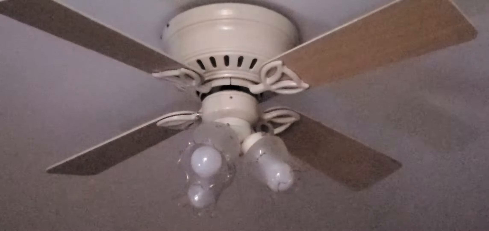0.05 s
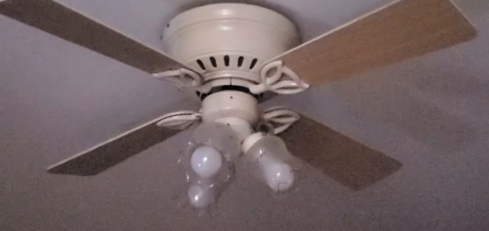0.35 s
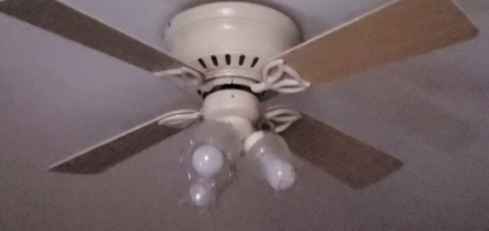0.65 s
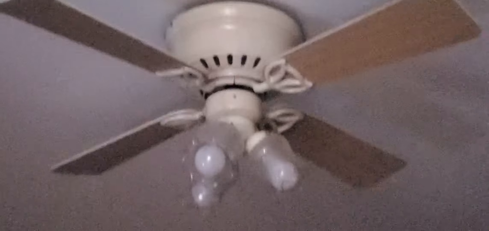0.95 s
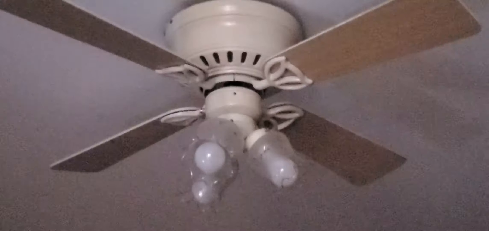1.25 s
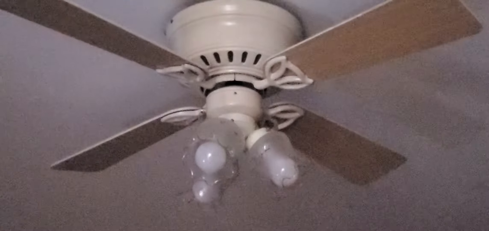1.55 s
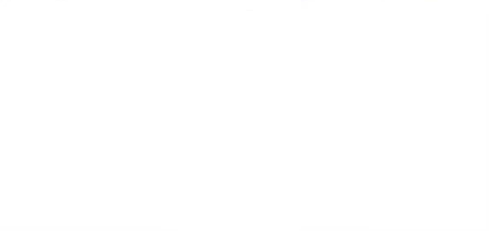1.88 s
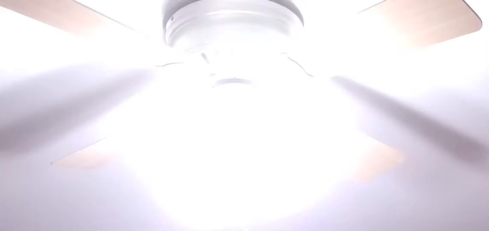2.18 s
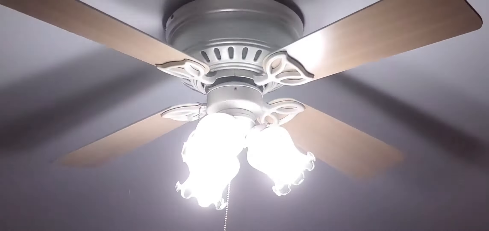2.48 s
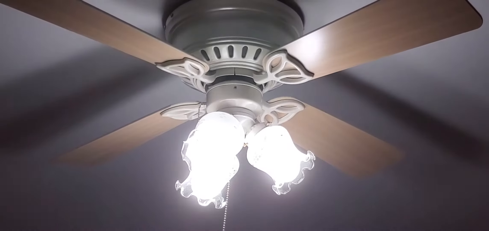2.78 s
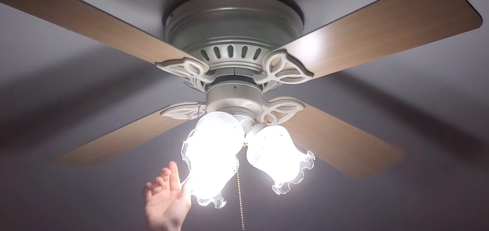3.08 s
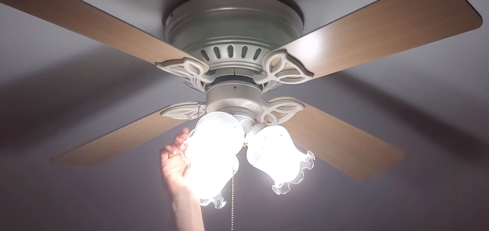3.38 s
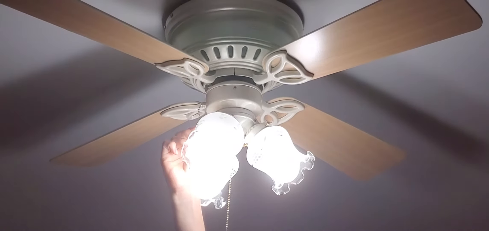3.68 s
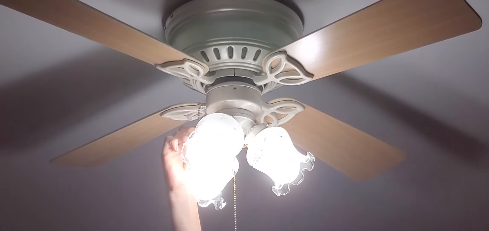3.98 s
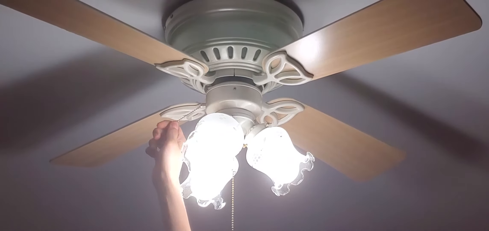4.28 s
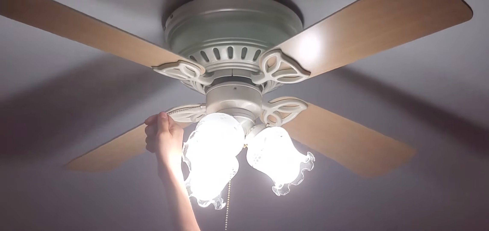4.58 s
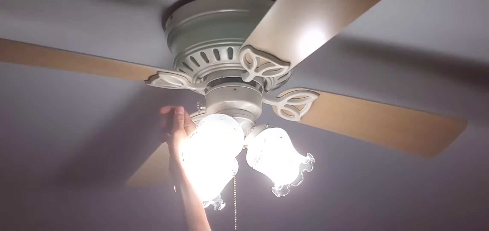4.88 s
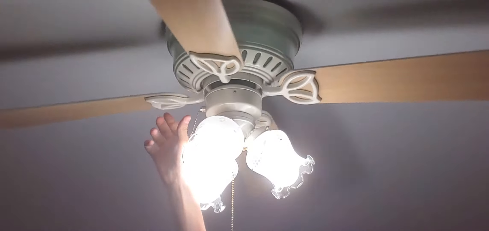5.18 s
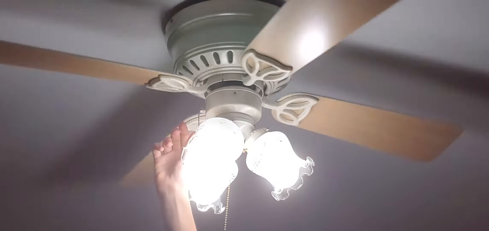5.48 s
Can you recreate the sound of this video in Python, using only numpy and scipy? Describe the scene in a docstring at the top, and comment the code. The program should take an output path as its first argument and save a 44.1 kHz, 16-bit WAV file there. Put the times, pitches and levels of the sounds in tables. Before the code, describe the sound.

Two wall switches snap amid handling bumps, then a ceiling fan's pull chain clicks and chinks over a faint hum.

```python
"""A small, quiet room: low air noise and the faint hum of a ceiling fan's motor.
A hand shifts on the microphone's case with ticks, scuffs, thuds and rumble. Near 1.8 s and 2.1 s two
wall switches snap, ringing plate and wall cavity. Clothes rustle as an arm reaches up. From 4.3 s it
works the pull chain: the ratchet clicks, the bead chain chinks and the hum rises.
At 5.5 s a thin whine joins briefly."""
import sys
import numpy as np
from scipy import signal
from scipy.fft import rfft, irfft
from scipy.io import wavfile
from scipy.ndimage import uniform_filter1d

SR = 44100
rng = np.random.default_rng(int(sys.argv[2]) if len(sys.argv) > 2 else 0)


def master_out(mix):
    """Clip the mix to full scale and print it as 16-bit PCM to the path in sys.argv[1]."""
    frames = np.transpose(np.atleast_2d(mix))
    ceiling = np.clip(frames, -1, 1)
    pcm = np.round(ceiling * 32767).astype(np.int16)
    wavfile.write(sys.argv[1], SR, pcm)


N = 248724
TIME = np.arange(N) / SR

# room air spectrum: f/Hz, level/dB
AIR_SPECTRUM = [(15, -30), (25, 2.5), (108, 2), (170, -9), (317, -9), (591, -22.5), (818, -34.5),
                (1560, -39), (3080, -50.5), (5730, -62), (6740, -32.5), (7510, -63), (8830, -41),
                (14800, -40), (16000, -39.5)]
# winding hum partials: f/HUM_HZ, level/dB
HUM_PARTIALS = [(.5, -9), (1, 0), (2, -18), (3, -25)]
# clothes rubbing as the body turns and steps: t/s, level/dB
BODY_RUB_CURVE = [(0, -74), (1.45, -71), (2.05, -67.5), (2.25, -59), (2.65, -84), (2.92, -61.5),
                  (3.27, -71.5), (4.3, -75.5), (5.6, -75)]
# soft cloth rub spectrum: f/Hz, level/dB
RUB_SPECTRUM = [(150, -2), (330, 0), (600, -7), (800, -3.5), (1000, -8.5), (1280, -9), (1650, -20),
                (3000, -19.5), (6000, -22), (8000, -37.5), (12000, -49.5)]
# swish spectrum: f/Hz, level/dB
SWISH_SPECTRUM = [(700, 1), (2000, -14), (3200, -7.5), (5800, 2.5), (7600, 1), (9500, 4.5), (14500, 5),
                  (16000, -6.5)]
# finger ticks on the case: t/s, level/dB, treble/dB, left-right/dB
FINGER_TICKS = [(0.186, -37.5, -14, -24), (0.498, -32.5, 4, -29), (0.504, -32.5, 6, -25),
                (.507, -15.5, -6.5, -7), (.510, -14, -10, -28), (0.967, -54.5, 4.5, 0),
                (1.195, -43, -23, -8), (1.474, -25.5, 2.5, -29), (1.5, -20.5, 2, -23), (1.505, -25, 7, 7.5),
                (2.089, -24.5, -30, -10), (2.233, -31.5, -13, -19), (2.422, -34.5, -26, -13),
                (2.9, -18, -30, -16)]
# tapped case spectrum: f/Hz, level/dB
CASE_SPECTRUM = [(80, 10), (300, 4), (560, 8), (700, -10.5), (900, 8.5), (1500, -3.5), (2000, -2.5),
                 (2500, -14.5), (3150, -3), (3800, -6.5), (5200, -10), (6500, -9), (9000, -18),
                 (15500, -4.5)]
# palm scuffs on the case: peak t/s, level/dB, left-right/dB, bright swish/dB
PALM_SCUFFS = [(0.294, -52.5, -15, -71.5), (0.506, -46, -10, -80), (1.195, -51, -18, -64),
               (1.479, -40.5, -8, -61), (2.782, -39, 0, -79), (2.818, -34.5, -0.5, -75),
               (2.86, -46, 3, -79), (2.903, -45.5, 2, -70)]
# palm-on-case spectrum: f/Hz, level/dB
PALM_SPECTRUM = [(100, 9), (420, -0.5), (620, -6), (850, -8.5), (1200, -11), (2300, -15.5), (4000, -23),
                 (6500, -26), (9000, -35), (15500, -35)]
# dull knocks: t/s, level/dB, f/Hz, left-right/dB
KNOCKS = [(0.299, -48, 79.4, -21), (0.504, -34, 65.3, -18), (0.502, -44.5, 169, -12),
          (.775, -46.5, 302, 24), (1.193, -39, 89, -38), (1.467, -24.5, 84, -29), (1.473, -29, 179, -27),
          (1.475, -35, 288, -32), (1.785, -33.5, 67.3, 4.5), (1.853, -35, 64.4, 5),
          (2.131, -36.5, 85.3, -27), (2.418, -44.5, 103.7, -17), (2.421, -49.5, 500, -17),
          (2.762, -29, 222, -0.5), (2.762, -32.5, 44.3, 3), (2.780, -32, 226, -1), (2.803, -26.5, 240, 0.5),
          (2.819, -30.5, 57, 1.5), (4.392, -44.5, 340, 0), (4.572, -44.5, 139, 1), (4.593, -45, 50, 2),
          (4.791, -42, 58.6, 2)]
# clothes swish and rub: peak t/s, length/s, swish/dB, rub/dB
CLOTH_STROKES = [(0.55, 0.14, -74, -63), (0.852, .07, -70, -64), (2.337, 0.076, -69.5, -57.5),
                 (2.461, 0.26, -72, -58.5), (2.83, 0.38, -67.5, -52.5), (3.076, 0.078, -60.5, -81),
                 (3.142, 0.095, -61.5, -53.5), (3.348, 0.085, -67, -75), (3.482, 0.054, -70, -64.5),
                 (3.55, 0.11, -71, -75), (3.797, 0.29, -75.5, -99), (3.9, 0.17, -66, -87),
                 (4.132, 0.15, -77.5, -67.5), (4.565, 0.15, -79, -66.5)]
# rumble as the grip shifts or the chain is held taut: t/s, length/s, level/dB, left-right/dB
RUMBLE_SPELLS = [(0.587, 0.37, -55.5, -15), (1.806, 0.49, -53, 0.5), (2.79, 0.13, -51, 4),
                 (4.394, 0.57, -51.5, 3)]
# rumble spectrum: f/Hz, level/dB
RUMBLE_SPECTRUM = [(20, -23), (48, -0.5), (68, 2.5), (100, -12.5), (160, -20.5), (400, -24.5), (2000, -81)]
# wall switch snaps: t/s, level/dB, plate/dB, cavity/dB, treble/dB
SWITCH_SNAPS = [(1.766, -20, -22, -33, 15.5), (1.770, -16.5, 2, -33, 17), (1.784, -19.5, 7, -7.5, 2),
                (2.110, -6.5, -5.5, -14, -15), (2.123, -14.5, 3, -1.5, -25)]
# toggle snap spectrum: f/Hz, level/dB
TOGGLE_SPECTRUM = [(150, -21.5), (380, -3.5), (540, -3), (680, -3.5), (1200, 1), (1650, -3.5), (2500, -3.5),
                   (4200, -0.5), (5200, -1), (7400, -9.5), (8800, -3), (11000, -0.5), (15500, -1)]
# wall plate modes: f/Hz, level/dB, t60/s
PLATE_MODES = [(875, -4, 0.05), (900, -1.5, 0.15), (929, 1.5, 0.2), (1024, -2.5, 0.088), (1034, -18, 0.78),
               (1310, -14, 0.27), (5200, -11, 0.07)]
# hollow wall modes: f/Hz, level/dB, t60/s
CAVITY_MODES = [(515, 4, 0.28), (573, 6, 0.14)]
# pull-chain ratchet clicks: t/s, level/dB, housing/dB, treble/dB, contact f/Hz
RATCHET_CLICKS = [(4.345, -29.5, -10, -6, 6250), (4.365, -22, -5.5, 0, 5400), (4.387, -23, 2, 10, 2280),
                  (4.391, -13.5, -5.5, 2, 2310), (4.404, -23, 10.5, -12, 2260),
                  (4.798, -22.5, -16, 6.5, 2720), (4.832, -6.5, -26.5, 4.5, 3180),
                  (4.838, -4, -13.5, 3, 5140), (4.846, -12.5, 5.5, -7.5, 3240),
                  (4.948, -9, -32.5, 3.5, 5080), (4.964, -11.5, -8.5, -10, 8100),
                  (5.387, -16, -43, -18, 5600), (5.393, -20, -38, -12, 4950), (5.423, -14, -49, -17, 3950),
                  (5.533, -43, -20, -1, 3680)]
# ratchet click spectrum: f/Hz, level/dB
RATCHET_SPECTRUM = [(300, -38.5), (850, -12.5), (1350, 2.5), (1700, -7), (2200, -2), (3400, -1),
                    (4200, -0.5), (5200, 3.5), (7000, -2), (8600, -3), (10000, 1.5), (12600, 4), (15500, 0)]
# ratchet housing spectrum: f/Hz, level/dB
HOUSING_SPECTRUM = [(120, -19), (200, 4), (330, -11), (540, 8.5), (750, 1.5), (840, 1), (1000, 3),
                    (1400, -1), (2000, -11), (5000, -41)]
# spring and pawl modes: f/Hz, level/dB, t60/s
PAWL_MODES = [(3135, -6, 0.21), (3630, -11.5, 0.36), (5050, -31.5, 0.22), (12300, 7.5, 0.13),
              (12850, 3.5, .10), (14650, 16, 0.075)]
# bead chain and fitting modes: f/Hz, level/dB, t60/s
CHAIN_MODES = [(3660, -24.5, 0.14), (4100, -17.5, 0.1), (5105, -8.5, 0.11), (5940, -9, 0.14),
               (6800, -10.5, 0.097), (7690, -0.5, 0.13), (8250, -6.5, 0.21), (8540, -0.5, 0.16),
               (8600, 0, 0.15), (8750, -5.5, 0.1), (9090, 0.5, 0.0904), (9750, -12, 0.064),
               (10720, -6.5, 0.19), (12500, -7.5, 0.09), (13300, -9.5, .12), (13870, -1, 0.18),
               (14592, -10, .08), (15105, -10.5, .08)]
# slack chain hitting its fitting: t/s, level/dB
CHAIN_CHINKS = [(4.391, -28), (4.950, -20), (4.964, -11), (4.978, -13.5), (5.007, -20.5), (5.387, -23.5)]
# microphone port balance: f/Hz, left-right/dB
PORT_BALANCE = [(100, -2), (330, 1.5), (520, 0), (750, -3.5), (1200, -6.5), (2000, 2), (3400, 3), (5000, 0),
                (9000, 1.5), (11000, 5.5), (13000, 2.5), (15500, 34.5)]
# electronic hiss spectrum: f/Hz, level/dB
HISS_SPECTRUM = [(2000, -22), (3300, 2), (4800, -33), (6700, 3), (7400, -20.5), (16000, -41)]

AIR_DB, HISS_DB = -60, -88
HUM_HZ, HUM_IDLE_DB, HUM_RUNNING_DB = 120, -68, -60.5
MOTOR_ON_S, MOTOR_RISE_S = 4.39, 0.06
CUTOFF_HZ = 16150


def from_db(db):
    """Decibels to gain."""
    return 10 ** (np.asarray(db) / 20)


def rms_one(x):
    """Scale to rms 1."""
    return x / np.sqrt(np.mean(x ** 2) + 1e-20)


def unit_energy(x):
    """Scale to mean energy 1 per channel."""
    return rms_one(x) / np.sqrt(x.shape[-1])


def panned(db):
    """Constant-power gains for a left-right difference."""
    gains = from_db(np.array([[.5], [-.5]]) * db)
    return gains / np.sqrt(np.mean(gains ** 2, axis=0))


def through(x, response):
    """Convolve, trim to N."""
    return signal.oaconvolve(np.atleast_2d(x), np.atleast_2d(response), axes=-1)[:, :N]


def colour(spectrum, size=4096):
    """Minimum-phase response of a spectrum."""
    hz, db = np.transpose(spectrum)
    grid_hz = np.maximum(np.fft.rfftfreq(size, 1 / SR), 1)
    magnitude = from_db(np.interp(np.log(grid_hz), np.log(hz), db))
    cepstrum = irfft(np.log(magnitude))
    cepstrum[1:size // 2] *= 2
    cepstrum[size // 2 + 1:] = 0
    return irfft(np.exp(rfft(cepstrum)))


def white_pair(correlation, size):
    """Two partly correlated white noises."""
    mid, side = rng.standard_normal((2, size))
    return np.sqrt(1 + correlation) * mid + np.sqrt(1 - correlation) * side * np.array([[1], [-1]])


def noise(spectrum, correlation):
    """Steady coloured stereo noise, rms 1."""
    response = colour(spectrum)
    white = white_pair(correlation, N + len(response) - 1)
    return rms_one(signal.oaconvolve(white, response[None], "valid", axes=-1))


def spell(start_s, length_s, attack_s, release_s):
    """Linear attack, hold, exponential release."""
    attack = np.clip((TIME - start_s) / attack_s, 0, 1)
    return attack * np.exp(-np.maximum(TIME - start_s - length_s, 0) / release_s)


def clicks(times_s, db):
    """One impulse per contact."""
    out = np.zeros(N)
    np.add.at(out, np.round(times_s * SR).astype(int), from_db(db))
    return out


def ringing(modes, beat_hz):
    """Decaying modes; their many room paths beat at random, differently at each port."""
    t = TIME[:SR // 3]
    knots_s = np.arange(200) / beat_hz
    out = 0
    for hz, db, t60_s in modes:
        paths = rng.standard_normal((2, 200)) + 1j * rng.standard_normal((2, 200))
        beating = np.array([np.interp(t, knots_s, path) for path in paths])
        envelope = from_db(-60 * t / t60_s) * (1 - np.exp(-t * hz / 3))
        wave = envelope * np.real(beating * np.exp(2j * np.pi * hz * t))
        out += from_db(db) * np.sqrt(t60_s) * wave / np.linalg.norm(wave, axis=1, keepdims=True)
    return unit_energy(out)


def room(x, direct_db, direct_t60_s, early_t60_s, late_db, late_t60_s, late_hz, correlation):
    """Brief direct crack, crowded wall and ceiling reflections, duller late tail."""
    size = SR // 2
    t = TIME[:size]
    direct = unit_energy(white_pair(correlation, size) * from_db(-60 * t / direct_t60_s))
    early = white_pair(correlation, size)
    early = unit_energy(early * from_db(4.4 * rng.standard_normal(size) - 60 * t / early_t60_s))
    late = signal.lfilter(*signal.butter(1, late_hz, fs=SR), white_pair(correlation, size))
    late = unit_energy(late * from_db(-60 * t / late_t60_s) * (1 - np.exp(-t / 0.014)))
    return through(x, unit_energy(from_db(direct_db) * direct + early + from_db(late_db) * late))


def near_echoes(echo_gain, spread_s):
    """Close surfaces return a click within milliseconds and comb its spectrum."""
    response = np.zeros((2, SR // 40))
    response[:, 0] = 1
    for side in response:
        lags = (rng.uniform(.15, 1, size=16) * spread_s * SR).astype(int)
        side[lags] = echo_gain * rng.choice([-1, 1], len(lags))
    return unit_energy(response)


def scattered_clicks(times_s, db, treble_db, spectrum, split_hz, echo_gain, spread_s):
    """Contacts at slightly different spots, each with its own near echoes."""
    out = np.zeros((2, N))
    body = unit_energy(colour(spectrum))
    dull = signal.lfilter(*signal.butter(1, split_hz, fs=SR), body)
    for at_s, gain, treble in zip(times_s, from_db(db), from_db(treble_db)):
        click = gain * (dull + treble * (body - dull))
        echoed = signal.fftconvolve(click[None], near_echoes(echo_gain, spread_s), axes=-1)
        start = round(at_s * SR)
        out[:, start:start + echoed.shape[1]] += echoed[:, :N - start]
    return out


def room_air():
    """Steady low murmur of the air."""
    return from_db(AIR_DB) * noise(AIR_SPECTRUM, correlation=0.89)


def motor_hum():
    """Windings hum at twice the mains rate, louder once switched on."""
    level_db = np.interp(TIME, [MOTOR_ON_S, MOTOR_ON_S + MOTOR_RISE_S], [HUM_IDLE_DB, HUM_RUNNING_DB])
    hum = sum(from_db(db) * np.sin(2 * np.pi * (ratio * HUM_HZ * TIME + rng.random()))
              for ratio, db in HUM_PARTIALS)
    return np.sqrt(2) * from_db(level_db) * hum


def rustle(catch_db=0.5):
    """Cloth rubs and swishes, fibres catching at random; a palm scuffs the case."""
    swish_gain, rub_gain = cloth_strokes()
    palm_gain, scuff_swish_gain = palm_scuffs()
    body_gain = from_db(np.interp(TIME, *np.transpose(BODY_RUB_CURVE)))
    scuff = palm_gain * noise(PALM_SPECTRUM, correlation=0.7)
    catching = rms_one(uniform_filter1d(rng.standard_normal(N), size=90))
    rub = np.hypot(rub_gain, body_gain) * noise(RUB_SPECTRUM, correlation=0.13)
    swish = np.hypot(swish_gain, scuff_swish_gain) * noise(SWISH_SPECTRUM, correlation=0.092)
    return rms_one(from_db(catch_db * catching)) * (rub + swish + scuff)


def finger_ticks(split_hz=950):
    """Fingers slip on the case, mostly by the right port: nearly dry, tip duller than nail."""
    times_s, db, treble_db, pan_db = np.transpose(FINGER_TICKS)
    lowpass = signal.butter(1, split_hz, fs=SR)
    contacts = []
    for side in (1, -1):
        side_db = db + side * pan_db / 2 - np.abs(pan_db) / 3
        plain, sharp = clicks(times_s, side_db), clicks(times_s, side_db + treble_db)
        contacts.append(sharp + signal.lfilter(*lowpass, plain - sharp + 1e-18))
    ticks = through(contacts, unit_energy(colour(CASE_SPECTRUM)))
    in_room = room(ticks, direct_db=22.5, direct_t60_s=0.014, early_t60_s=0.4,
                   late_db=-17, late_t60_s=0.4, late_hz=5140, correlation=0.14)
    return from_db(-1.5) * ticks + from_db(4.5) * in_room


def palm_scuffs(rise_db_per_s=905, fall_db_per_s=267):
    """Stereo palm gain and bright swish gain: each scuff bites fast, slides out slower."""
    palm, swish = 0, 0
    for peak_s, db, pan_db, swish_db in PALM_SCUFFS:
        slide = from_db(-np.maximum((peak_s - TIME) * rise_db_per_s, (TIME - peak_s) * fall_db_per_s))
        sides_db = db + np.array([[1], [-1]]) * pan_db / 2 - abs(pan_db) / 3
        palm = np.hypot(palm, from_db(sides_db) * slide)
        swish = np.hypot(swish, from_db(swish_db) * slide)
    return palm, swish


def thuds(swell_cycles=0.85):
    """Soft blows swell and die in a few cycles; lower ones last longer."""
    out = np.zeros((2, N))
    for at_s, db, hz, pan_db in KNOCKS:
        cycles = hz * np.maximum(TIME - at_s, 0)
        age = np.minimum(cycles / swell_cycles, 40)
        out += panned(pan_db) * from_db(db) * age * np.exp(1 - age) * np.sin(2 * np.pi * cycles)
    return out


def cloth_strokes(edge_db=9, roundness=1.35):
    """Swish and rub gains: each stroke swells and fades with arm speed."""
    swish, rub = 0, 0
    for peak_s, length_s, swish_db, rub_db in CLOTH_STROKES:
        fall_db = edge_db * np.abs(2 * (TIME - peak_s) / length_s) ** roundness
        speed = from_db(-np.minimum(fall_db, 200))
        swish = np.hypot(swish, from_db(swish_db) * speed)
        rub = np.hypot(rub, from_db(rub_db) * speed)
    return swish, rub


def rumble():
    """Countless small jolts merge into spells of low rumble."""
    gain = sum(panned(pan_db) * from_db(db) * spell(at_s, length_s, attack_s=0.0067, release_s=0.11)
               for at_s, length_s, db, pan_db in RUMBLE_SPELLS)
    return gain * noise(RUMBLE_SPECTRUM, correlation=0.9)


def wall_switches():
    """Each toggle snaps over and lands, ringing the plate and the hollow wall."""
    times_s, db, plate_db, cavity_db, treble_db = np.transpose(SWITCH_SNAPS)
    snap = scattered_clicks(times_s, db, treble_db, TOGGLE_SPECTRUM,
                            split_hz=13200, echo_gain=0.12, spread_s=0.004)
    plate = through(clicks(times_s, db + plate_db), ringing(PLATE_MODES, beat_hz=148.8))
    cavity = through(clicks(times_s, db + cavity_db), ringing(CAVITY_MODES, beat_hz=58))
    in_room = room(snap, direct_db=-12, direct_t60_s=0.041, early_t60_s=0.16,
                   late_db=-5.5, late_t60_s=0.21, late_hz=5070, correlation=0.062)
    return from_db(2) * in_room + from_db(2.5) * plate + from_db(1.5) * cavity


def contact_pings(times_s, db, pitches_hz, t60_s):
    """Each contact rings for an instant at its own pitch."""
    out, t = np.zeros(N), TIME[:SR // 50]
    for at_s, gain, hz in zip(times_s, from_db(db), pitches_hz):
        ping = np.sin(2 * np.pi * hz * t) * from_db(-60 * t / t60_s)
        out[int(at_s * SR):][:len(t)] += gain * unit_energy(ping)
    return out


def pull_chain(contact_db=-9, shake_db=-24.5):
    """The ratchet clicks in its housing on pull and release; the slack chain chinks on its fitting."""
    times_s, db, housing_db, treble_db, contact_hz = np.transpose(RATCHET_CLICKS)
    ratchet = scattered_clicks(times_s, db, treble_db, RATCHET_SPECTRUM,
                               split_hz=12000, echo_gain=0.99, spread_s=0.005)
    pings = contact_pings(times_s, db + contact_db, contact_hz, t60_s=0.0055)
    # hard contacts ring the pawl most
    pawl = through(clicks(times_s, 0.95 * db + treble_db), ringing(PAWL_MODES, beat_hz=91))
    housing = through(clicks(times_s, db + housing_db - 9.5), unit_energy(colour(HOUSING_SPECTRUM)))
    jolts = clicks(times_s, db + shake_db) + clicks(*np.transpose(CHAIN_CHINKS))
    chinks = through(jolts, ringing(CHAIN_MODES, beat_hz=169))
    in_room = room(ratchet + pings + housing, direct_db=-10.5, direct_t60_s=0.023, early_t60_s=0.18,
                   late_db=-11, late_t60_s=0.28, late_hz=4990, correlation=0.05)
    return from_db(4) * in_room + from_db(12.5) * chinks + from_db(1) * pawl


def motor_whine(hz=1012, level_db=-70):
    """Brief thin tone as the blades gather speed."""
    envelope = spell(start_s=5.53, length_s=0.022, attack_s=0.022, release_s=0.08)
    return np.sqrt(2) * from_db(level_db) * envelope * np.sin(2 * np.pi * hz * TIME)


def scene():
    """Switches, handling and motor over the room's air."""
    return (room_air() + wall_switches() + pull_chain()
            + finger_ticks() + thuds() + rustle() + motor_hum() + motor_whine() + rumble())


def record(dry):
    """Per-port colour (more treble left), faint electronic hiss, steep top cut."""
    hz, balance_db = np.transpose(PORT_BALANCE)
    ports = [colour(np.column_stack([hz, db])) for db in 20 * np.log10(panned(balance_db))]
    hiss = from_db(HISS_DB) * noise(HISS_SPECTRUM, correlation=0.84)
    lowpass = signal.ellip(12, .2, 80, CUTOFF_HZ, fs=SR, output="sos")
    return signal.sosfilt(lowpass, through(dry, ports) + hiss)


dry = scene()
out = record(dry)
master_out(out)
```